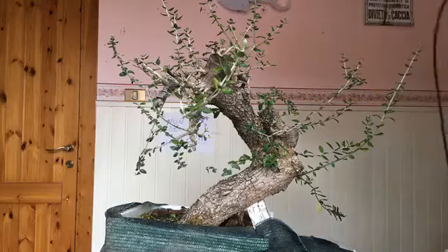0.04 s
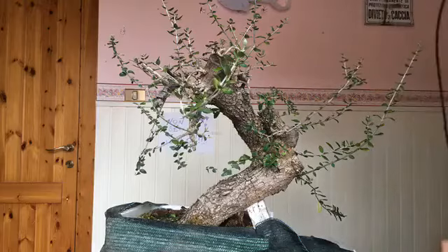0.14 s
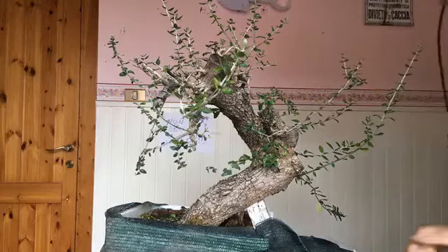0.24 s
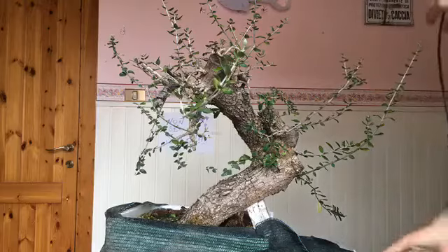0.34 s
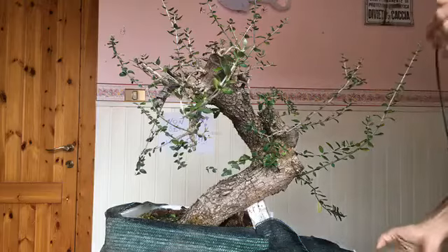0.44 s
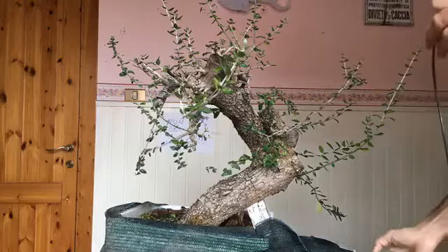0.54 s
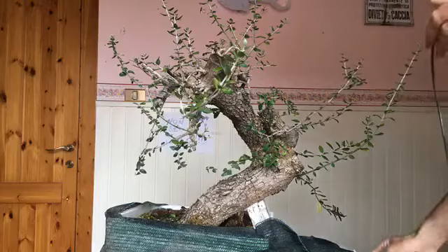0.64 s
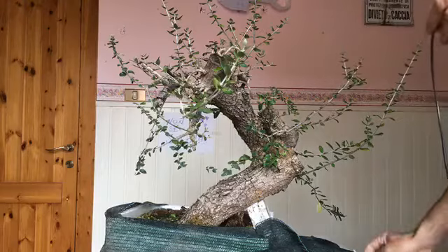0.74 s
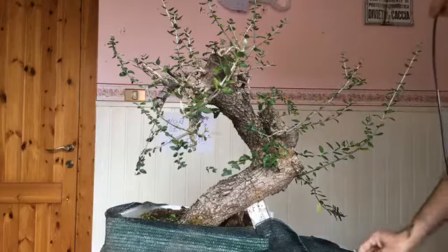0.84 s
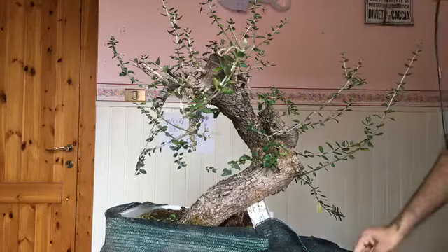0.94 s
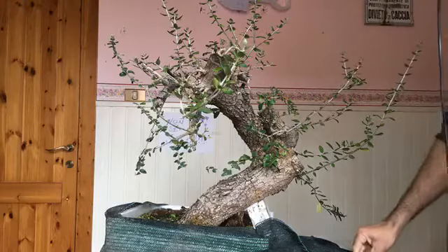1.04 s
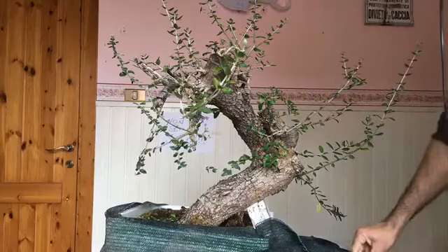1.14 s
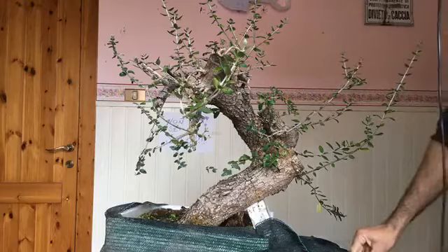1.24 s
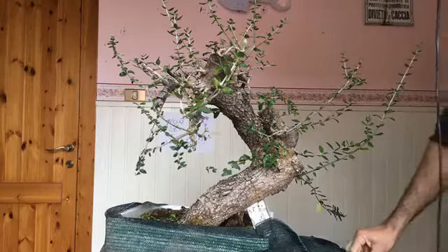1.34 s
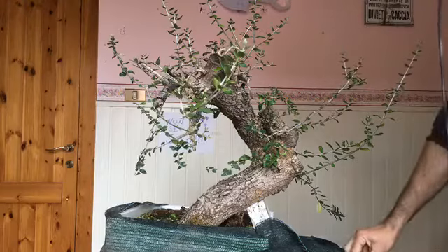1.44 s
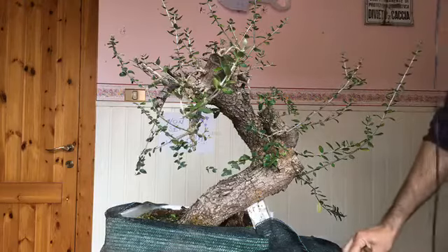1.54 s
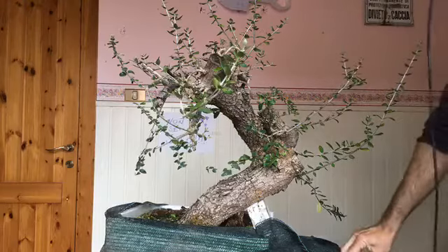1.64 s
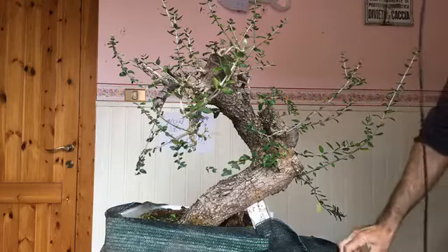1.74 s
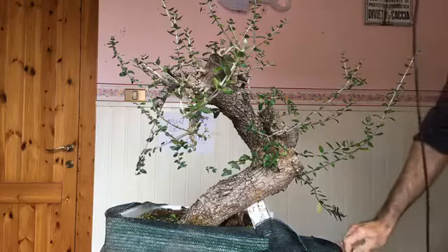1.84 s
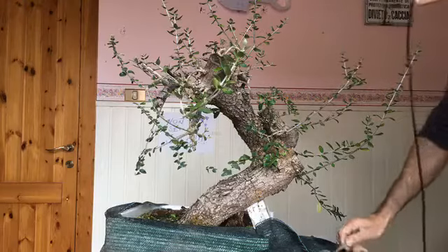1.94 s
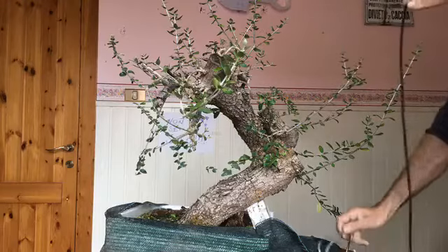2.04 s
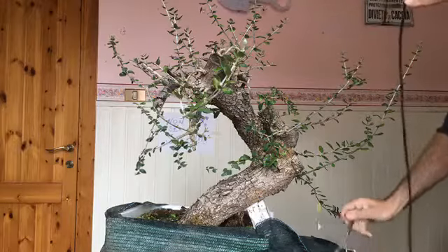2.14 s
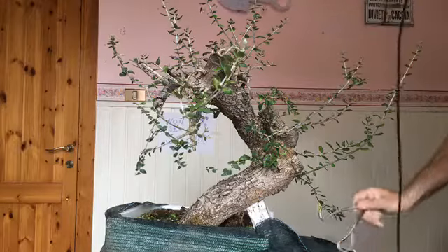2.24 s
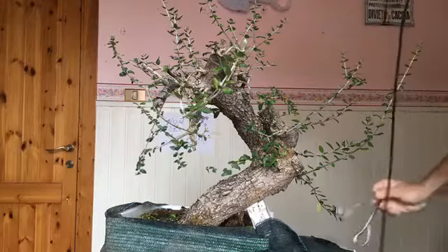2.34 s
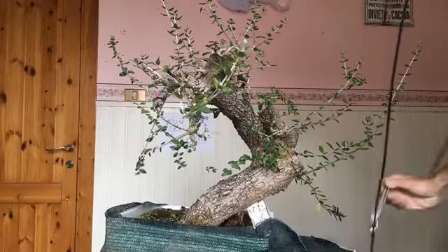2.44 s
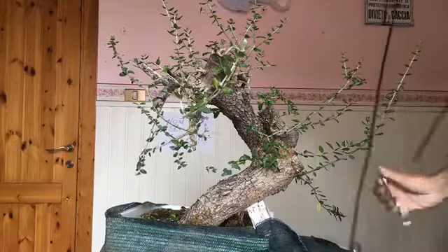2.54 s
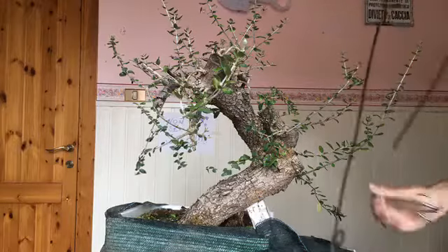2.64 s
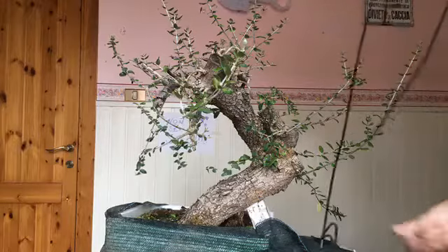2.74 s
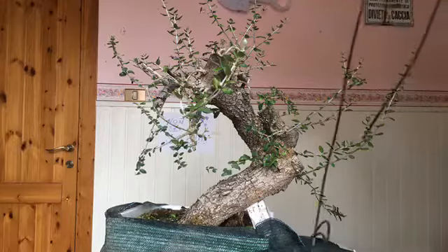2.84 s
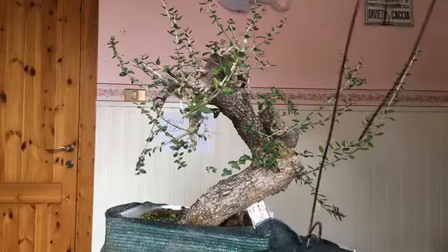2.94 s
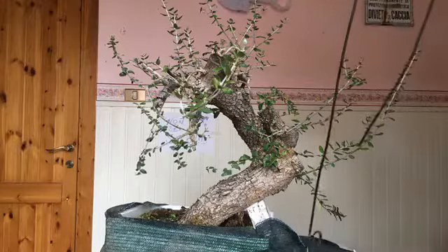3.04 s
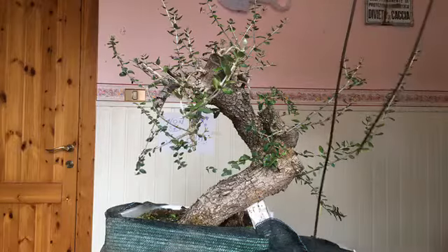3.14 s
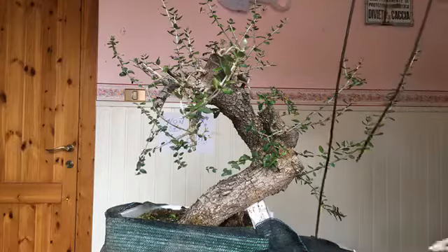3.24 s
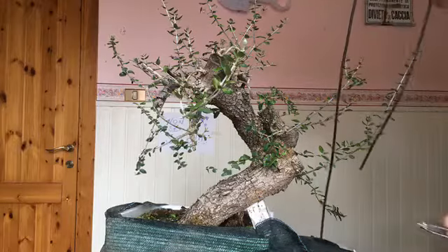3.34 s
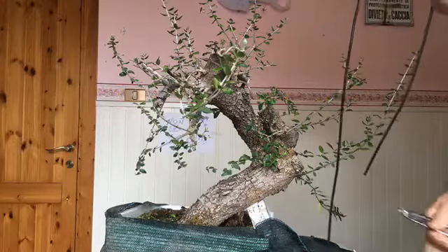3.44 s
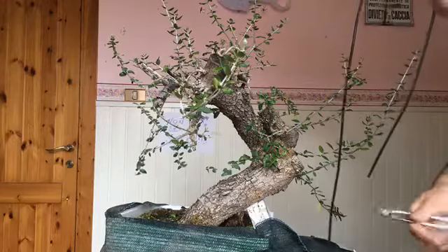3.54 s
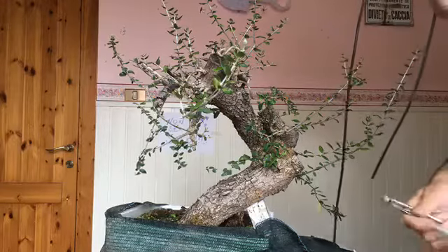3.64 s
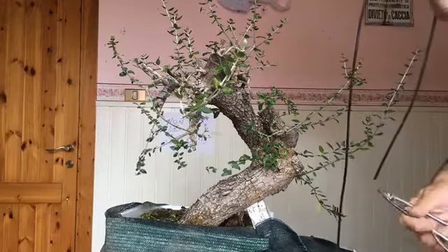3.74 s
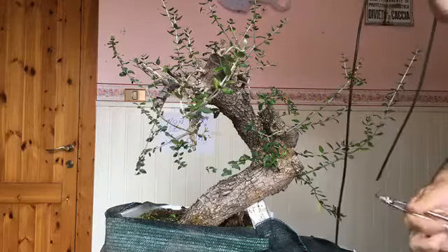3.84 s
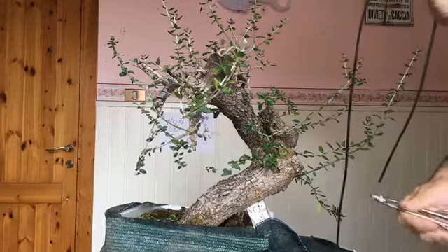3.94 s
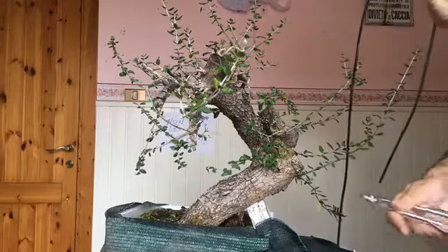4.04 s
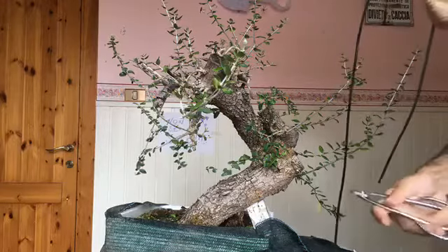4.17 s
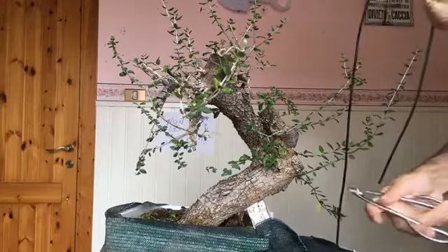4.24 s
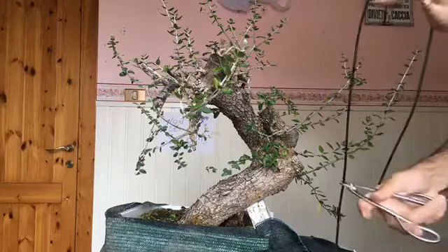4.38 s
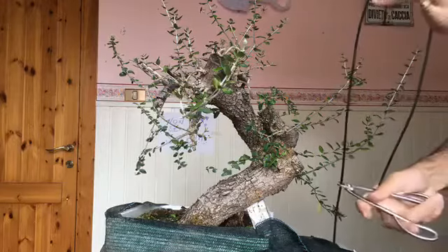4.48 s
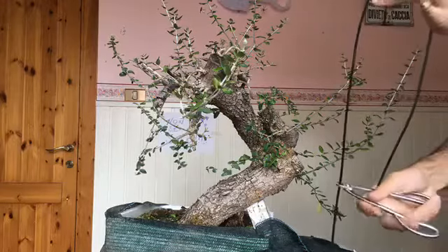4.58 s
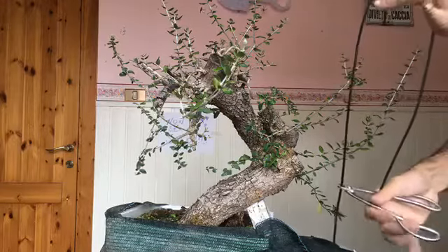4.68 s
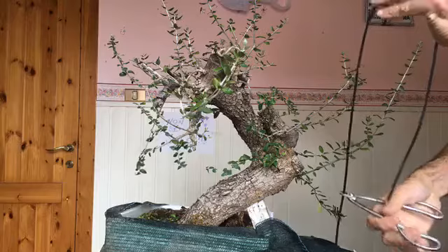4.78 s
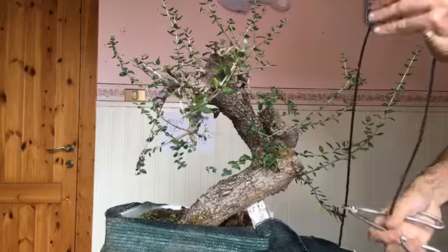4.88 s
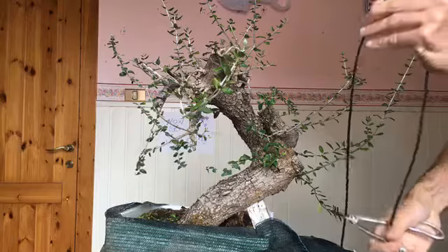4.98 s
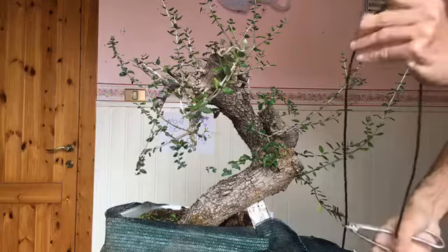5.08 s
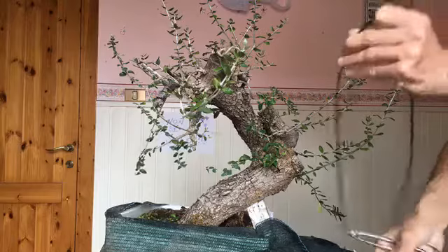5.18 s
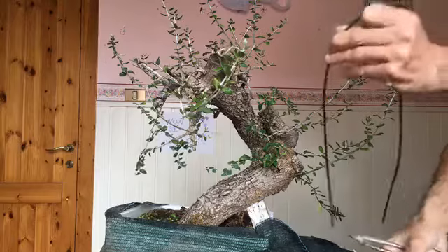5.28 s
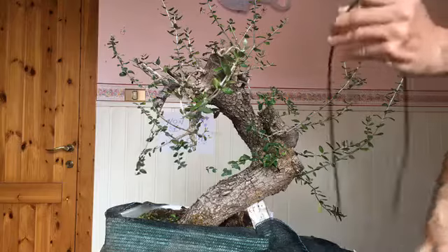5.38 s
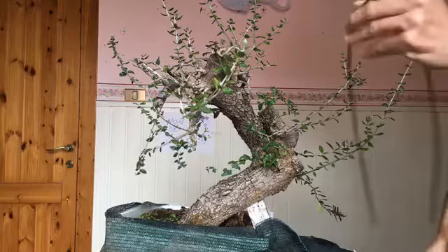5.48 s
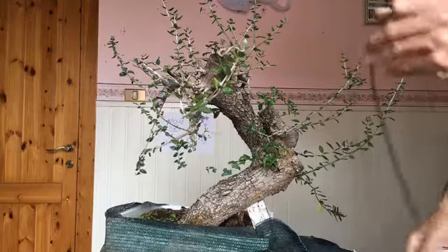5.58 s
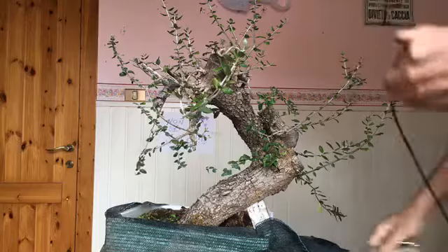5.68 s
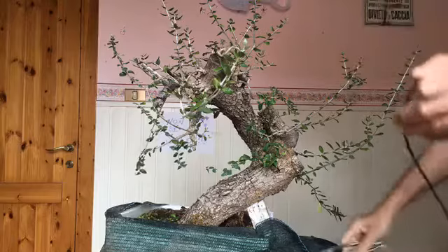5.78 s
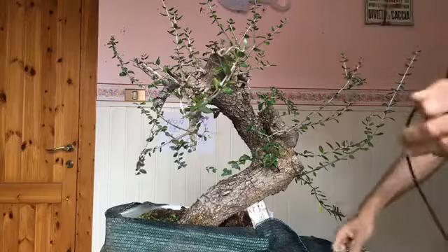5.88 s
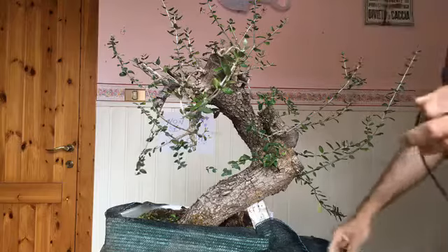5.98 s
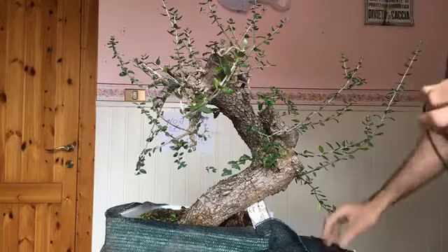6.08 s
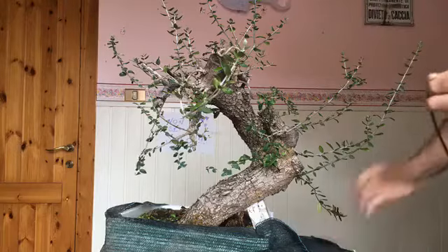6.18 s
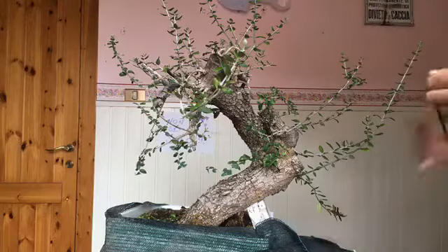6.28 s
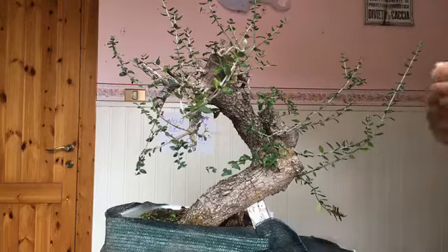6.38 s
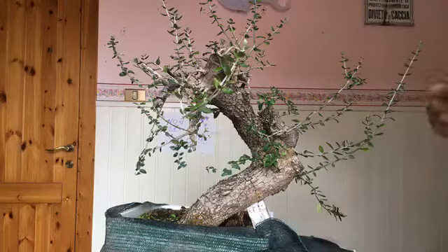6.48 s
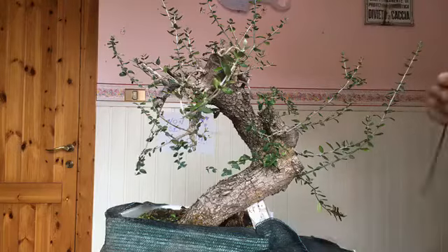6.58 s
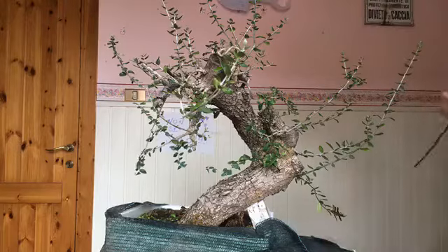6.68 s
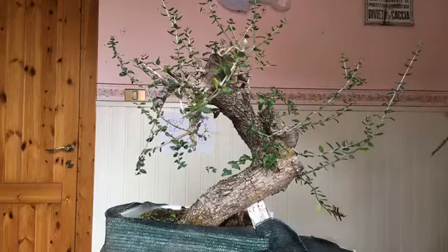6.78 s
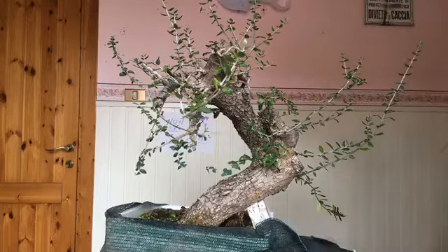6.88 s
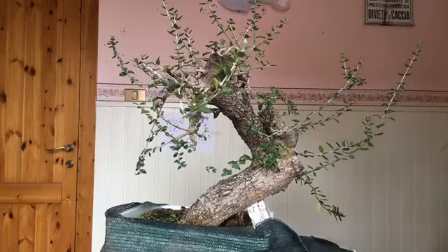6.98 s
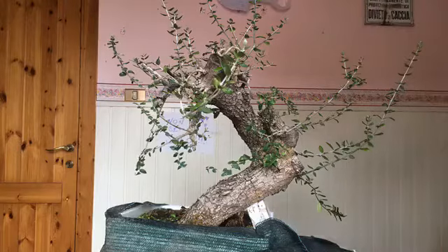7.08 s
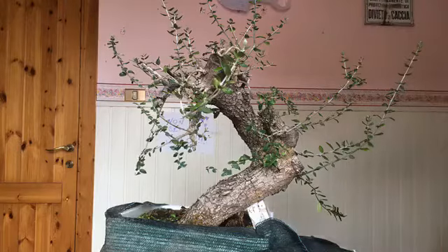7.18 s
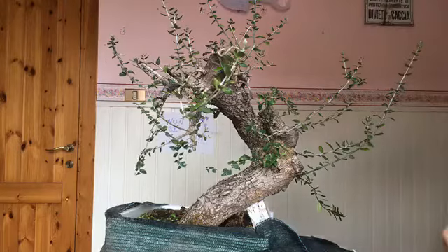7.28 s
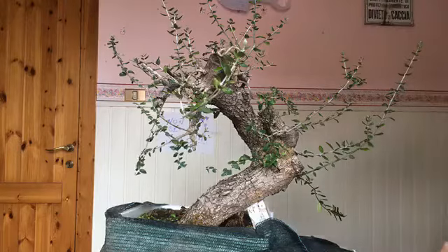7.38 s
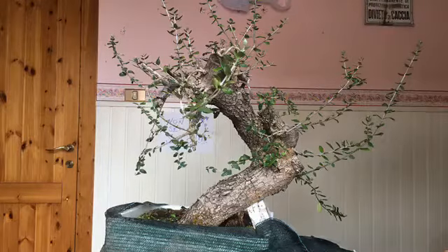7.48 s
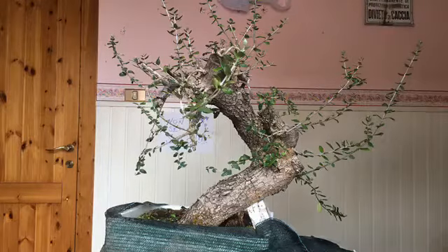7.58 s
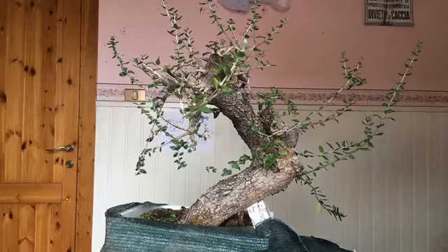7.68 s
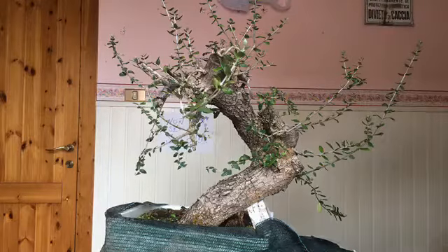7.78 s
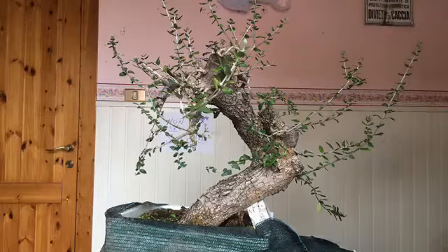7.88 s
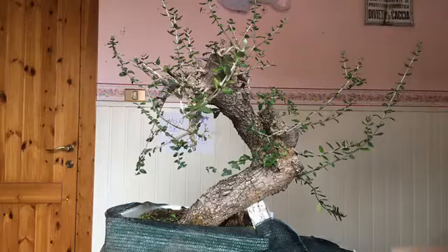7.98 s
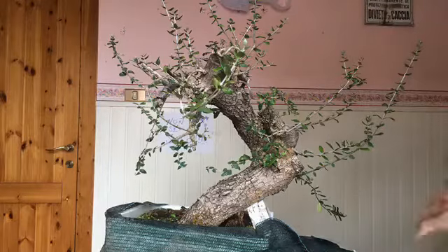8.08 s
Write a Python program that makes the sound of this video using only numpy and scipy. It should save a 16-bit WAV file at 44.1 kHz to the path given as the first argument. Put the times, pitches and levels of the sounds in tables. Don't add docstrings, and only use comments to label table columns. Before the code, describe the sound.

In a hard-walled room, faint wire rustles and wood taps lead to a loud snip, bright metallic rattling, a tool drop, then near silence.

```python
import sys
import numpy as np
from scipy import signal
from scipy.fft import rfft, irfft, next_fast_len
from scipy.io import wavfile

SR = 44100
rng = np.random.default_rng(int(sys.argv[2]) if len(sys.argv) > 2 else 0)


def amplitude_ratio(level_db):
    exponent = np.asarray(level_db, float) / 20
    return 10 ** exponent


def output_pcm(signal):
    pcm = np.clip(np.atleast_2d(signal).T, -1, 1) * 32767
    wavfile.write(sys.argv[1], SR, np.round(pcm).astype(np.int16))


N = 357941


def rms_one(x):
    return x / np.sqrt(np.mean(x ** 2) + 1e-20)


def peak_one(x):
    return x / np.max(np.abs(x))


def at_hz(points, hz):
    table_hz, values = np.array(points)[:, 0], np.array(points)[:, 1]
    return np.interp(np.log(hz + 1), np.log(table_hz), values)


def band(x, low_hz, high_hz):
    return signal.sosfilt(signal.butter(2, [low_hz, high_hz], "band", fs=SR, output="sos"), x)


def ring(x, hz, t60):
    r, w = amplitude_ratio(-60 / (t60 * SR)), 2 * np.pi * hz / SR
    return signal.lfilter([0, np.sin(w)], [1, -2 * r * np.cos(w), r * r], x + 1e-18)


def add(out, s, sound):
    i = round(s * SR)
    out[i:i + len(sound)] += sound[:N - i]


def swells(t, peak_s, peak_db, swell_s, fall_db_per_s):
    since = t[:, None] - peak_s
    rise = np.clip(1 + since / np.maximum(swell_s, .0005), 0, 1)
    fall = amplitude_ratio(peak_db - np.abs(fall_db_per_s) * np.maximum(since, 0))
    return np.sqrt(np.sum((rise * fall) ** 2, axis=1))


def burst(length_ms, size=8192):
    return rng.standard_normal(size) * np.exp(-np.arange(size) * 1000 / SR / max(length_ms, .1))


def crack(length_ms):
    touch = .04 * burst(length_ms)
    touch[0] = 1
    for lag in rng.integers(4, 26, size=3):
        loop = np.r_[1, np.zeros(lag - 1), .6]
        touch = signal.lfilter(loop[::-1], loop, touch)
    return touch


def metal(touch, middle_db, notes, ring_db):
    bright = rms_one(band(band(signal.lfilter([1, -.45], 1, touch), 2100, 21000), 3700, 21000))
    middle = rms_one(band(touch, 1700, 4100))
    notes = rms_one(band(notes, 1600, 16000))
    sound = bright + amplitude_ratio(middle_db) * middle + amplitude_ratio(ring_db) * notes
    return sound / np.max(np.abs(bright))


def rumble():
    # (peak time [s], level [dB], swell [s], fall [dB/s])
    booms = [(.58, -54, .1, 39), (1.04, -48.5, 0.073, 91), (1.4, -68, .15, 22), (2.6, -65, 0.12, 23),
             (5.22, -63, 0.099, 300), (5.56, -51, 0.21, 48), (6.04, -44.5, 0.306, 84),
             (6.259, -56, .06, 102), (6.5, -64.5, 0.074, 31), (7.041, -62, 0.17, 60),
             (7.26, -61.5, 0.051, 17), (8.11, -63, 0.28, 15)]
    # (time [s], level [dB], frequency [Hz])
    drone = [(1.7, -66, 56.3), (1.9, -57.5, 57.7), (2.2, -53.5, 57.5), (2.42, -53, 57.5), (2.5, -82, 56)]
    engine_db = -72
    t, coarse = np.arange(N) / SR, np.arange(0, N, 256) / SR
    level = np.interp(t, coarse, np.hypot(swells(coarse, *np.transpose(booms)), amplitude_ratio(engine_db)))
    boom = level * rms_one(band(rng.standard_normal(N), 38, 72.6))
    s, level_db, hz = np.transpose(drone)
    cycles = np.cumsum(np.interp(t, s, hz)) / SR
    return boom + amplitude_ratio(np.interp(t, s, level_db)) * np.sin(2 * np.pi * cycles)


def hiss():
    # (frequency [Hz], level per Hz [dB])
    hiss_colour = [(53, -22.5), (90, -6.5), (219, -9), (310, -12), (499, -18), (593, -16), (786, -17),
                   (1410, -16.5), (1790, -19), (15000, -21.5), (16000, -22.5)]
    hiss_db = -69.5
    hz = np.fft.rfftfreq(N, 1 / SR)
    shaped = rfft(rng.standard_normal(N)) * amplitude_ratio(at_hz(hiss_colour, hz))
    return amplitude_ratio(hiss_db) * rms_one(irfft(shaped, N))


def ticks():
    # (time [s], crack peak [dB], middle relative to crack [dB], ringing frequency [Hz])
    touches = [(0.034, -41, -36, 8750), (0.118, -42, -19, 9060), (0.1699, -35, -16, 9200),
               (0.484, -44, -4.5, 4040), (0.5166, -33, -20, 7840), (0.62, -44.5, 0.5, 4180),
               (0.779, -41, -29, 4790), (0.927, -50, -6.5, 2900), (0.966, -38, -3, 3020),
               (1.0327, -42.5, -14, 4530), (1.1204, -51, -16, 8400), (1.178, -47, -23, 9010),
               (1.256, -35, -29, 10800), (1.3182, -35.5, -14.5, 8600), (1.351, -37.5, -32, 6900),
               (1.4267, -38.5, -25, 9100), (1.476, -34, -35, 8650), (1.5873, -38, -8.5, 7100),
               (1.665, -42.5, -21, 8700), (1.719, -35, -14.5, 9330), (1.8328, -35, -12.5, 2700),
               (2.0202, -50.5, -23, 2660), (2.1296, -45.5, -21, 9250), (2.28, -45, -18, 9000),
               (2.341, -36, -14, 2540), (4.1688, -46.5, -14, 3920), (4.2212, -47, -17, 9400),
               (4.804, -54.5, -3.5, 3440), (6.5336, -55, 8, 3470)]
    contact_ms, ring_db = 1.9, -9.5
    out = np.zeros(N)
    for s, peak_db, middle_db, hz in touches:
        touch = crack(contact_ms)
        add(out, s, amplitude_ratio(peak_db) * metal(touch, middle_db, ring(touch, hz, 0.026), ring_db))
    return out


def rustle(slides, colour, wire_db):
    # (frequency [Hz], t60 [s], share [dB])
    wire_notes = [(2700, 0.17, -8), (4075, 0.047, -7.5), (5540, 0.018, -5), (9000, 0.09, -17)]
    slips_per_s, spread_db = 3500, 3.0
    sizes = amplitude_ratio(spread_db * np.minimum(rng.exponential(1, N), 5)) * rng.choice([-1, 1], N)
    slips = rms_one(sizes * (rng.random(N) < slips_per_s / SR)) + rng.standard_normal(N)
    slips = slips + sum(amplitude_ratio(db + wire_db) * rms_one(ring(slips, hz, t60)) for hz, t60, db in wire_notes)

    size = next_fast_len(N)
    hz = np.fft.rfftfreq(size, 1 / SR)
    shaped = rfft(slips, size) * amplitude_ratio(at_hz(colour, hz))
    share = 1 / (1 + (hz / 6000) ** 8)
    middle = rms_one(irfft(shaped * share, size)[:N])
    bright = rms_one(irfft(shaped * (1 - share), size)[:N])

    s, bright_db, middle_db, swell_s, fall = np.transpose(slides)
    t, coarse = np.arange(N) / SR, np.arange(0, N, 32) / SR
    bright_level = np.interp(t, coarse, swells(coarse, s, bright_db - 5, swell_s, fall))
    middle_level = np.interp(t, coarse, swells(coarse, s, bright_db + middle_db - 5, swell_s, fall))
    return bright_level * bright + middle_level * middle


def sliding():
    # (peak time [s], bright level [dB], middle relative to bright [dB], swell [s], fall [dB/s])
    handling = [(.036, -47.5, -14.5, 0.021, 88), (.155, -64, 11, 0.053, 114), (.17, -50.5, -26, 0.0072, 81),
                (.485, -41, -1, 0.004, 1500), (.523, -41.5, -2.5, 0.032, 195), (.779, -66, 9, 0.0045, 200),
                (.968, -53.5, 7, .006, 500), (1.0, -60.5, -1.5, .02, 28), (1.18, -65, -3, 0.11, 180),
                (1.257, -51, -8, 0.0046, 40), (1.353, -47.5, -11, .008, 300), (1.479, -47, -12, 0.04, 152),
                (1.719, -49.5, -8.5, 0.16, 181), (4.168, -63.5, -1.5, 0.0057, 62),
                (4.22, -60, -5, .006, 217)]
    snipping = [
        (5.081, -31.5, -3, .0015, 180),
        (5.168, -22, -16, 0.094, 80.3),
        (5.39, -36.5, -10, .2, 300),
    ]
    rattling = [
        (5.404, -14, -13.5, 0.014, 92),
        (5.52, -23, -34.5, 0.25, 91),
        (5.53, -35, 1, 0.0034, 87),
    ]
    dropping = [
        (5.877, -38, -1.5, .002, 100),
        (5.921, -48, 7.5, 0.0054, 104),
        (5.948, -25.5, -3, 0.0075, 195),
    ]
    coiling = [
        (6.535, -74, 15, 0.016, 90.3),
        (6.63, -61, -8, 0.1, 60),
        (7.01, -58.5, -5, 0.86, 99.5),
        (7.348, -63.5, -2, 0.9, 201),
        (7.512, -65, -1, 0.15, 81),
        (7.692, -62.5, -1.5, 0.11, 171),
        (8.086, -66, -2, 0.046, 200),
    ]
    # (frequency [Hz], level per Hz [dB])
    handling_colour = [(710, -18), (1200, -10), (2500, -9), (4500, -7.5), (8800, 1), (15600, -1.5)]
    snipping_colour = [(530, -53.5), (900, -28), (2600, -14), (3270, -15), (4050, -8.5), (4790, -11.5),
                       (8800, 1.5), (15600, 2.5)]
    rattling_colour = [(530, -43), (900, -7.5), (1030, -9), (1560, -8), (3510, -9.5), (4300, -4),
                       (4900, -12), (15600, -6)]
    dropping_colour = [(530, -43), (900, 2.5), (1800, -2.5), (3350, -12), (4100, -3), (7270, -10),
                       (15600, -14)]
    coiling_colour = [(710, -9), (1200, -13), (1920, -9), (4080, -1.5), (5000, -6.5), (10300, 0.5),
                      (13000, 1), (15600, -3)]
    return (rustle(handling, handling_colour, wire_db=-12)
            + rustle(snipping, snipping_colour, wire_db=-9.5)
            + rustle(rattling, rattling_colour, wire_db=-13.5)
            + rustle(dropping, dropping_colour, wire_db=-15)
            + rustle(coiling, coiling_colour, wire_db=-22))


def knocks():
    # (time [s], peak [dB], strongest note [Hz], second note [Hz], length [ms])
    wood_blows = [(.123, -58.5, 994, 692, 30), (.410, -60, 232, 605, 9.9), (.490, -37.5, 247, 435, 49),
                  (.598, -39.5, 413, 1026, 25.5), (.842, -55, 518, 1020, 55),
                  (0.972, -34.5, 395, 198, 35.7), (1.238, -51.5, 560, 1002, 52), (1.336, -52, 197, 245, 38),
                  (1.558, -50.5, 493, 210, 34), (1.706, -47, 188, 720, 58), (1.849, -54, 817, 185, 21),
                  (5.085, -56.5, 1050, 590, 6.3), (5.398, -28, 590, 1010, 24), (5.531, -34, 842, 1515, 29),
                  (5.613, -37, 814, 856, 9.3), (5.875, -34, 288, 188, 37), (5.921, -24.5, 478, 1070, 14.4),
                  (5.950, -31, 341, 250, 11.5), (6.533, -63.5, 1020, 1486, 42)]
    board_hz, board_db, board_t60_s = 180, -5, 0.16
    out = np.zeros(N)
    for s, peak_db, hz, second_hz, length_ms in wood_blows:
        touch = burst(length_ms, size=16384)
        second_share = .7 * min(hz / second_hz, 1) ** .6
        notes = rms_one(ring(touch, hz, .055)) + second_share * rms_one(ring(touch, second_hz, .05))
        body = rms_one(band(band(touch, hz / 3.16, hz * 1.4), 150, 9000))
        board_share = amplitude_ratio(board_db) * min(330 / hz, 1)
        body = body + board_share * rms_one(ring(touch, board_hz, board_t60_s))
        notes_db = max(-2.5 - 1.4 * (peak_db + 44), -4.0)
        add(out, s, amplitude_ratio(peak_db) * peak_one(body + amplitude_ratio(notes_db) * notes))
    return out


def cutters():
    # (time [s], crack peak [dB], middle relative to crack [dB], handle note [Hz], ring relative to crack [dB])
    tool_blows = [(1.835, -27.5, -32, 9980, -3), (2.341, -18, -46, 4750, -6.5),
                  (2.6025, -25, -40, 9930, -2.5), (5.073, -35, 6.5, 9380, -10), (5.078, -6, -20, 11000, -6),
                  (5.081, -12.5, -20.5, 13200, -18), (5.162, -12, -30, 9000, -16.5),
                  (5.396, -2.5, -11, 8500, -18), (5.405, -5.5, -26, 13930, -14.5),
                  (5.5311, -27, 1, 4315, 5.5), (5.534, -38, -8, 1590, 11), (5.712, -43, -17, 2080, 3.5),
                  (5.784, -44, 2.5, 2850, -0.5), (5.874, -15.5, -16, 6950, -6.5),
                  (5.919, -19.5, -2.5, 2360, -4), (5.947, -12, -23, 7160, -3.5)]
    # (frequency [Hz], level relative to handle note [dB])
    jaws = [(4750, -12), (5500, -24.5), (3980, -19)]
    out = np.zeros(N)
    for s, peak_db, middle_db, handle_hz, ring_db in tool_blows:
        touch = crack(1.49)
        handles = ring(touch, handle_hz, .022) + .4 * ring(touch, .97 * handle_hz, .012)
        notes = rms_one(handles) + sum(amplitude_ratio(db) * rms_one(ring(touch, hz, .018)) for hz, db in jaws)
        add(out, s, amplitude_ratio(peak_db) * metal(touch, middle_db, notes, ring_db))
    return out


def clicks():
    # (time [s], peak [dB])
    cut = (5.0787, -9)
    # (time [s], peak [dB])
    bright_clicks = [(2.3413, -17), (2.348, -31), (5.1024, -14.5), (5.109, -21), (5.1144, -15.5),
                     (5.1374, -7.5), (5.1654, -11), (5.1806, -9.5), (5.1906, -11.5), (5.2024, -25),
                     (5.394, -12), (5.4024, -2.5), (5.411, -5), (5.4184, -10), (5.432, -10), (5.4474, -10),
                     (5.455, -3.5), (5.4794, -8.5), (5.6234, -19.5), (5.8324, -34), (5.9744, -16.5),
                     (5.9864, -17)]
    snap, bounces = np.zeros((2, N))
    snap[round(cut[0] * SR)] = 1
    for s, peak_db in bright_clicks:
        add(bounces, s, amplitude_ratio(peak_db - 1) * crack(.7))
    return amplitude_ratio(cut[1]) * peak_one(band(snap, 400, 3000)) + 1.6 * band(bounces, 6000, 21000)


def thumps():
    # (time [s], peak [dB], first frequency [Hz], last frequency [Hz], t60 [s])
    cut_thump = [
        (5.0785, -16.5, 420, 40, .115),
    ]
    later_thumps = [
        (5.398, -28, 275.5, 47.3, 0.49),
        (5.931, -54, 200, 58, 0.33),
    ]
    sweep_ms = 4.0
    out, t = np.zeros(N), np.arange(SR // 2) / SR
    for s, peak_db, first_hz, last_hz, t60 in cut_thump + later_thumps:
        hz = last_hz + (first_hz - last_hz) * np.exp(-t * 1000 / sweep_ms)
        cycles = np.cumsum(hz) / SR + 1 / 3
        attack = np.minimum(t * 2000, 1)
        add(out, s, amplitude_ratio(peak_db - 60 * t / t60) * np.sin(2 * np.pi * cycles) * attack)
    return out


def room(x):
    # (frequency [Hz], t60 [s])
    echo_t60 = [(150, 0.66), (600, 0.41), (2000, 0.39), (6000, 0.3), (15000, 0.31)]
    t = np.arange(SR) / SR
    tail = 0
    for low in 70 * 2.0 ** np.arange(8):
        tail = tail + band(rng.standard_normal(SR), low, 2 * low) * amplitude_ratio(-60 * t / at_hz(echo_t60, 1.4 * low))
    arrival = np.clip((t - .0012) / 0.0033, 0, 1)
    nearby = 1 + 2.3 * np.exp(-t / 0.0029)
    tail = tail * arrival * nearby
    return signal.fftconvolve(x, tail / np.sqrt(np.sum(tail ** 2)))[:N]


def scene():
    send_db = {"ticks": 2, "tool": 2.5, "wood": -1.7, "sliding": -11.5, "clicks": -12.5}
    near = {"ticks": ticks(), "tool": cutters(), "wood": knocks(), "sliding": sliding(), "clicks": clicks()}
    wet = room(sum(amplitude_ratio(send_db[name]) * sound for name, sound in near.items()))
    return (sum(near.values()) + wet + thumps() + rumble() + hiss())[None]


def band_limit(x):
    return signal.sosfilt(signal.butter(12, 16800, fs=SR, output="sos"), x)


def record(dry):
    # (frequency [Hz], width [Hz], level [dB])
    notches = [(5000, 300, -3), (7700, 200, -2), (10330, 250, -5)]
    cut_hz = 15850
    hz = np.fft.rfftfreq(N, 1 / SR)
    colour_db = sum(db * np.exp(-((hz - f) / width) ** 2) for f, width, db in notches)
    colour_db = colour_db - 45 * np.clip((hz - cut_hz) / 300, 0, 1)
    mix = irfft(rfft(dry) * amplitude_ratio(colour_db), N)
    return band_limit(mix)


dry = scene()
out = record(dry)
output_pcm(out)
```